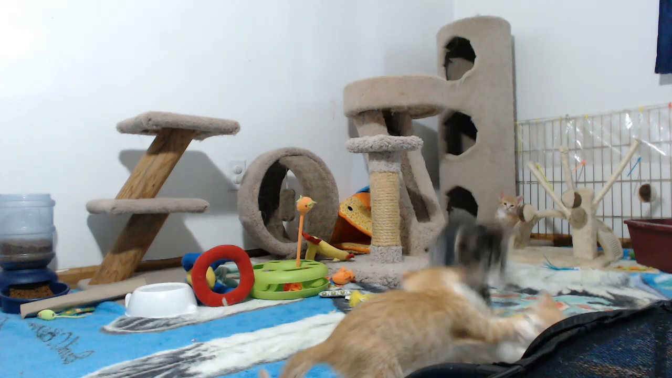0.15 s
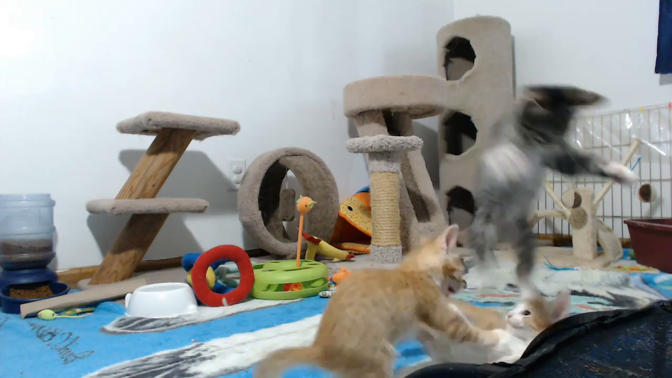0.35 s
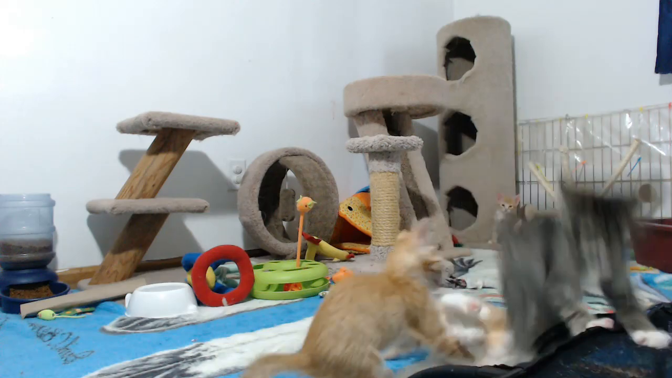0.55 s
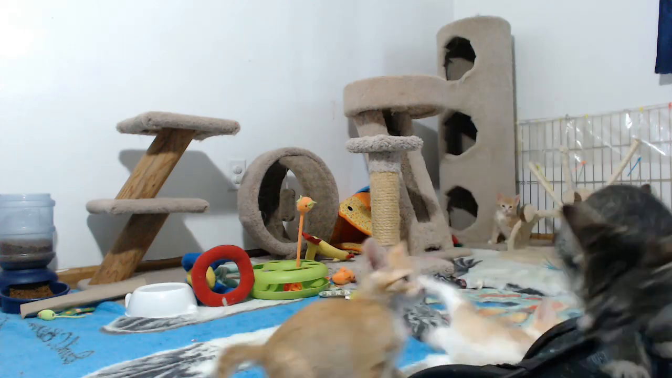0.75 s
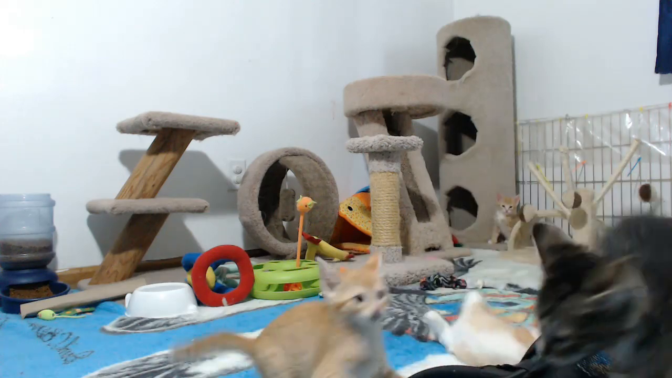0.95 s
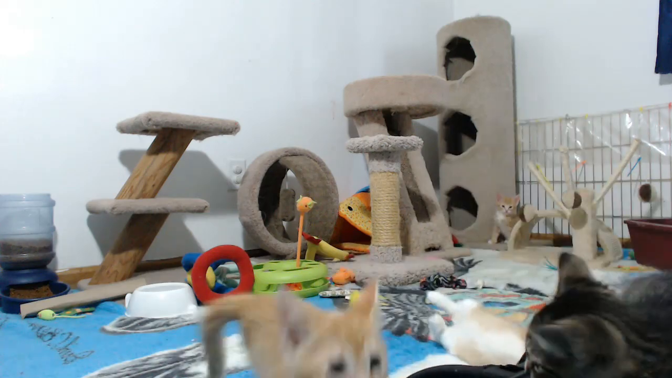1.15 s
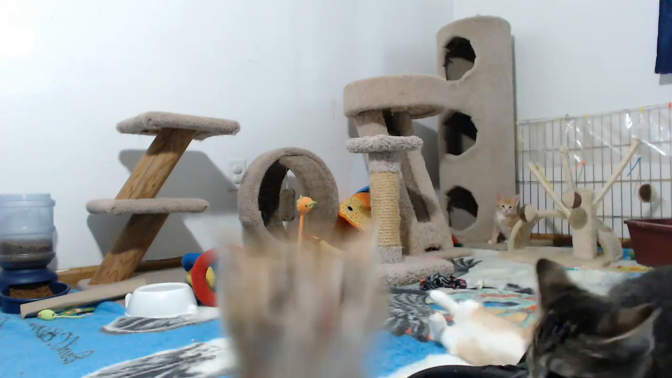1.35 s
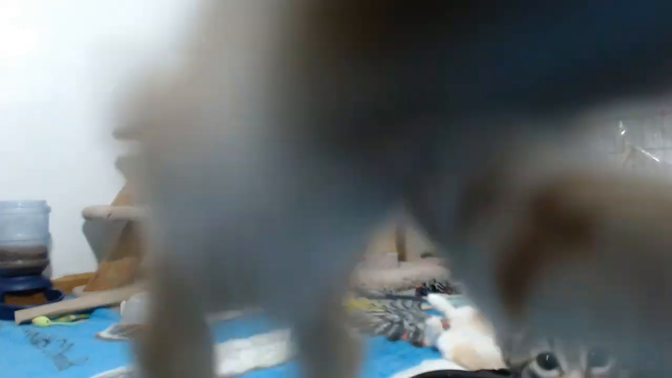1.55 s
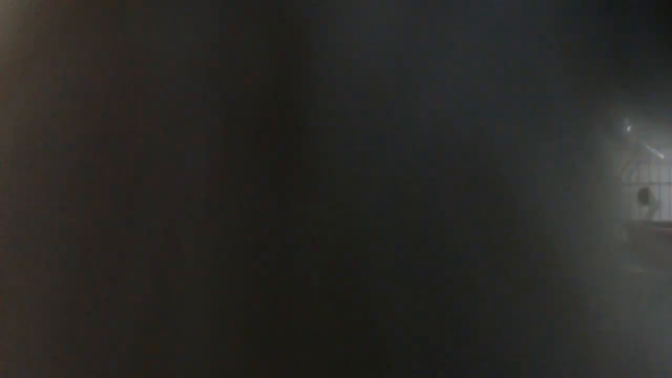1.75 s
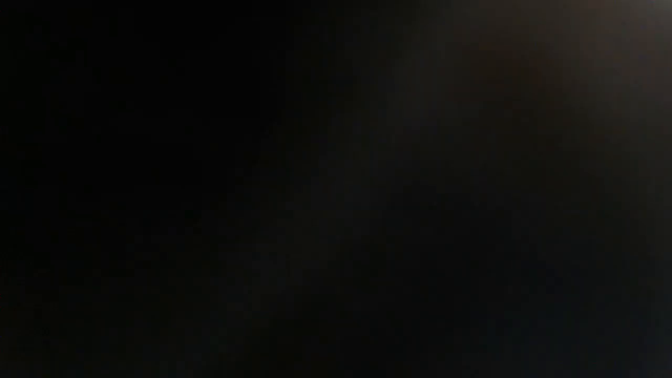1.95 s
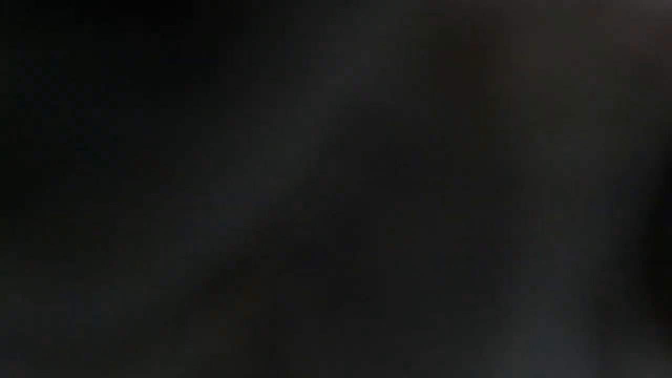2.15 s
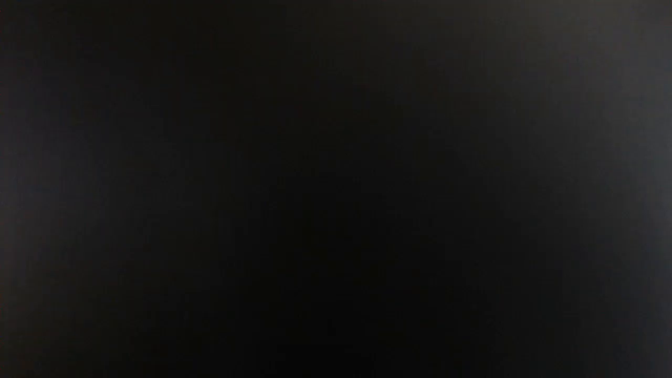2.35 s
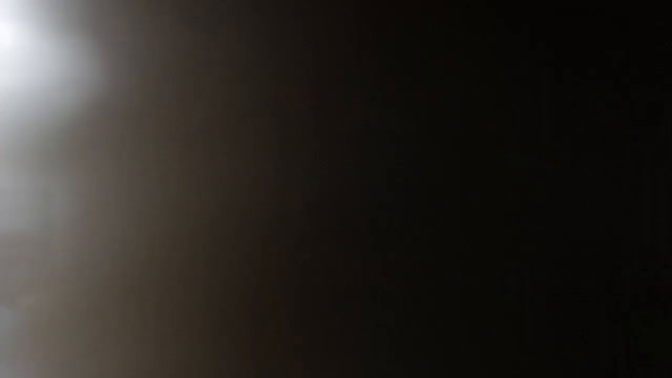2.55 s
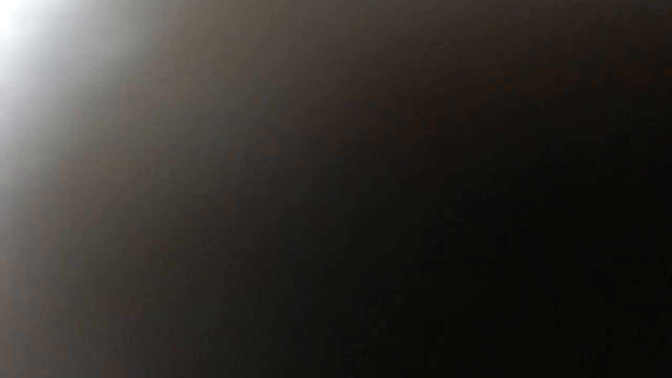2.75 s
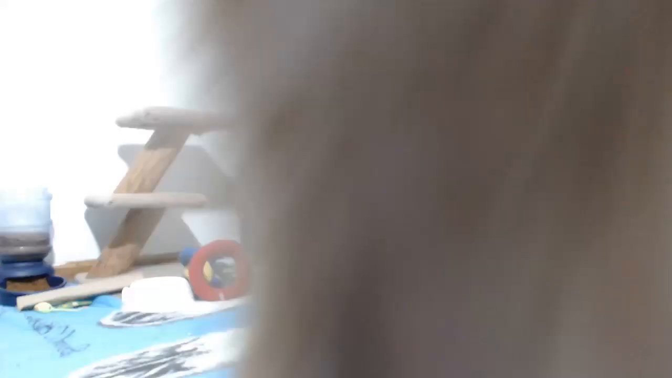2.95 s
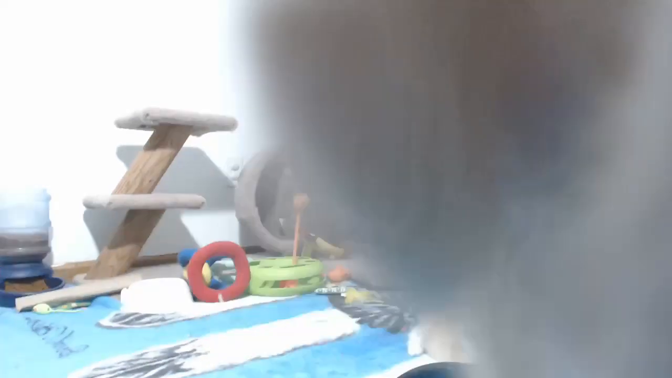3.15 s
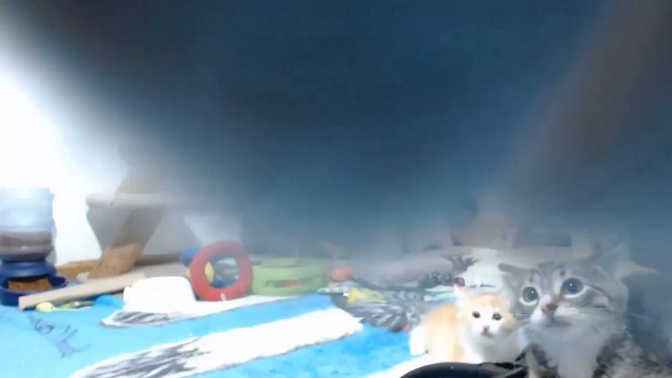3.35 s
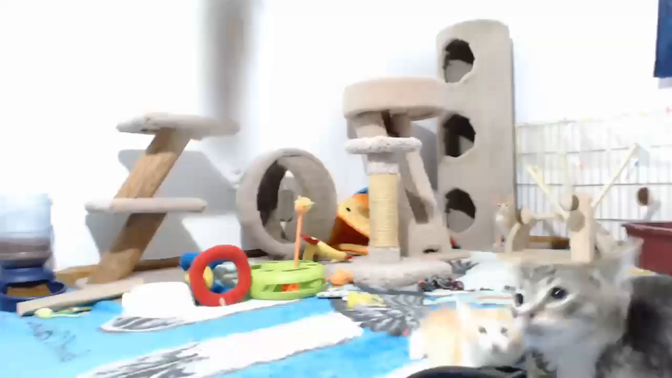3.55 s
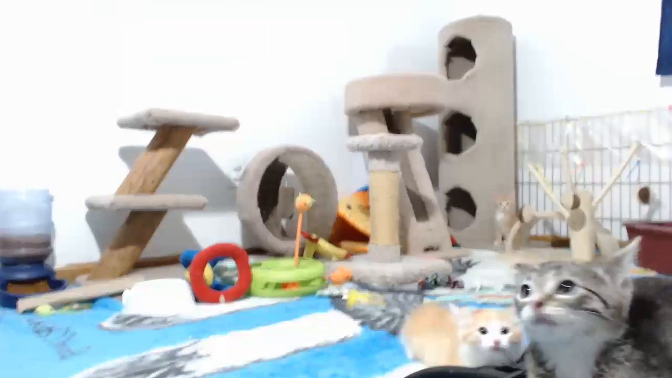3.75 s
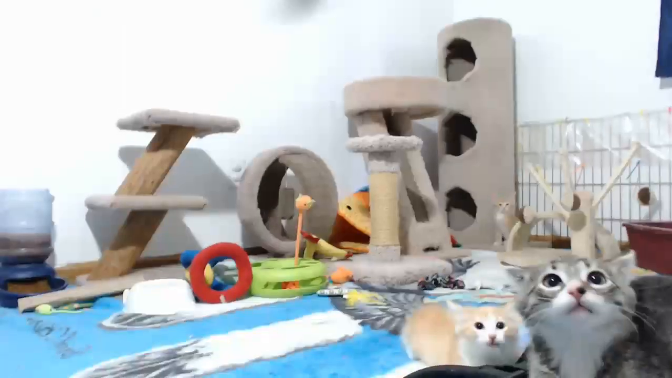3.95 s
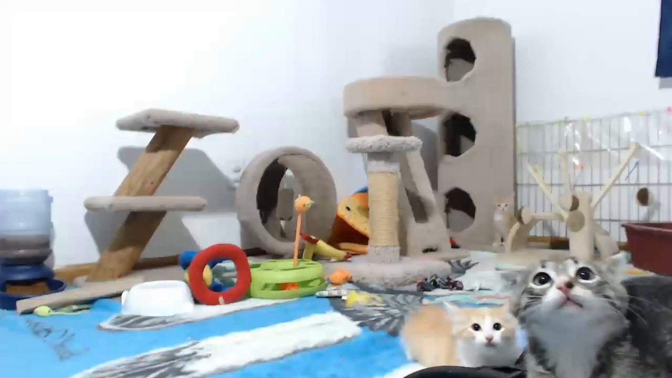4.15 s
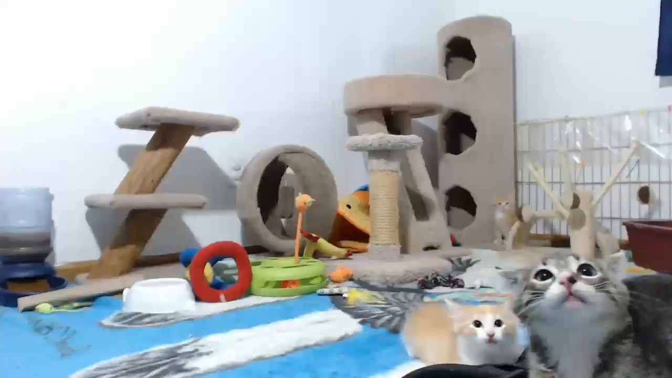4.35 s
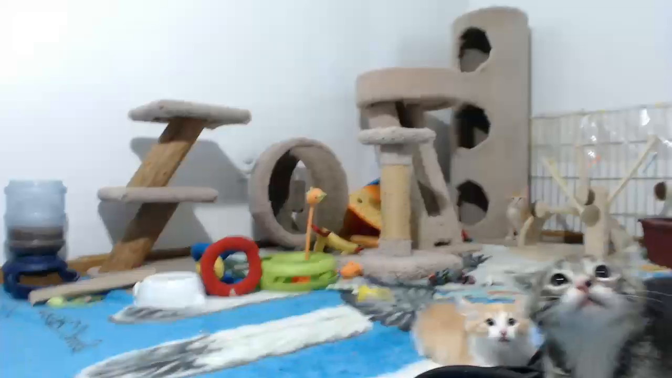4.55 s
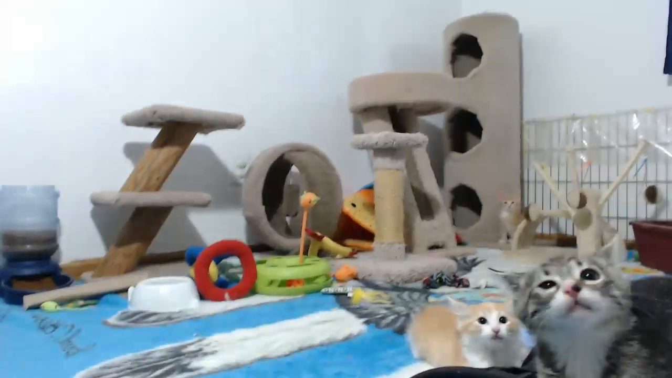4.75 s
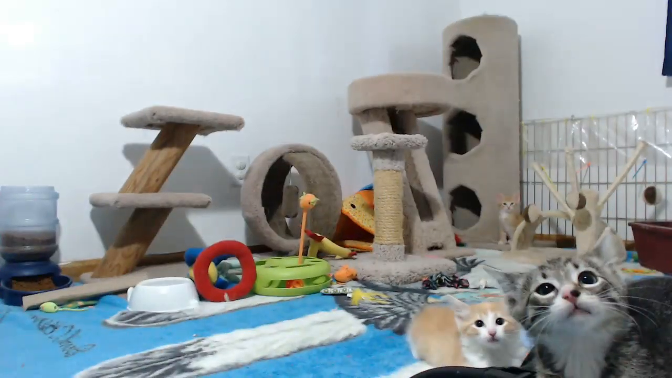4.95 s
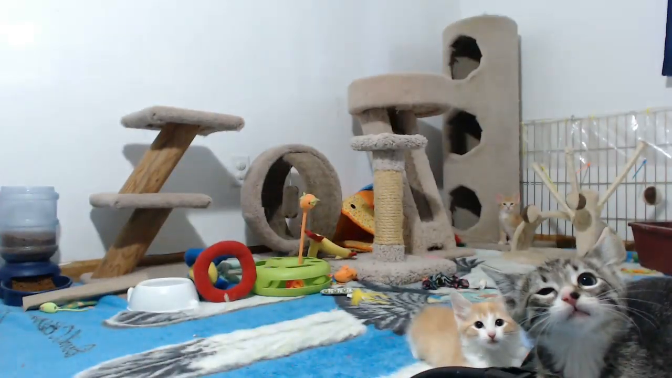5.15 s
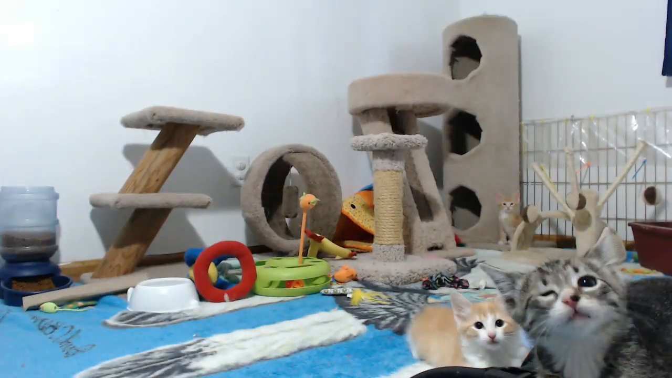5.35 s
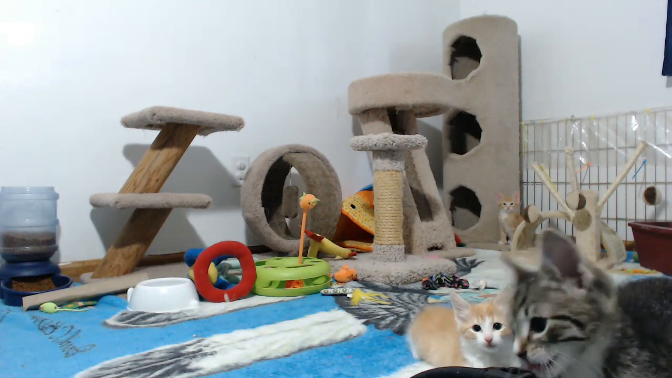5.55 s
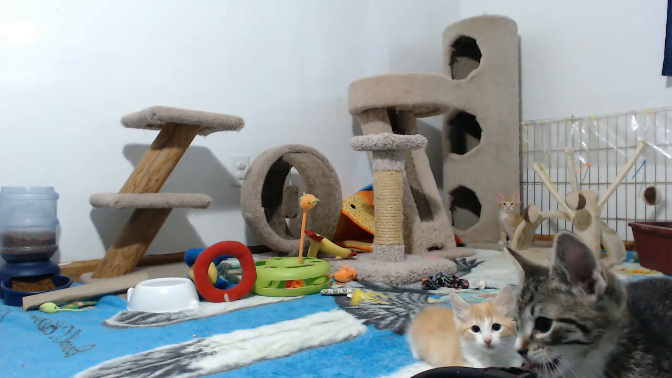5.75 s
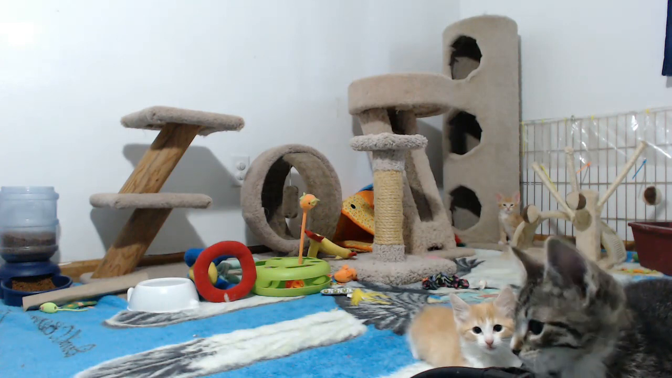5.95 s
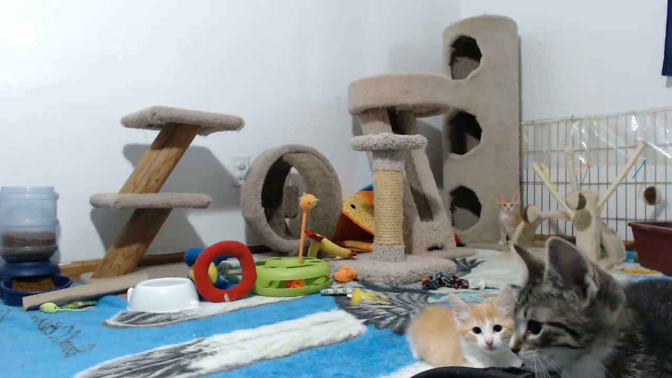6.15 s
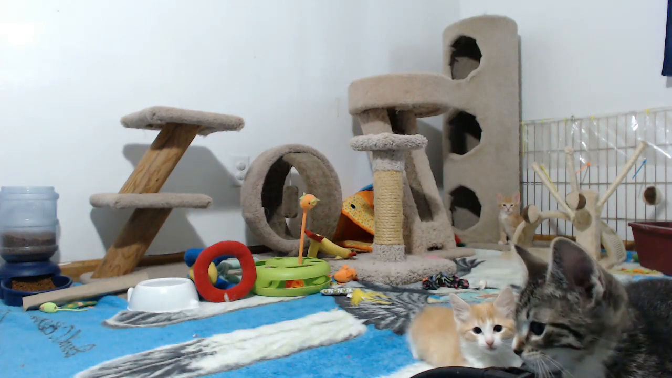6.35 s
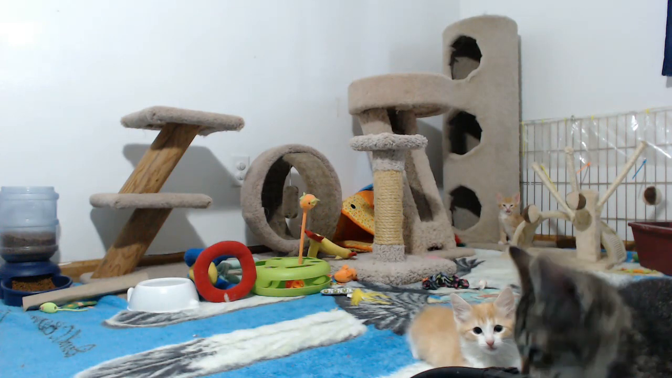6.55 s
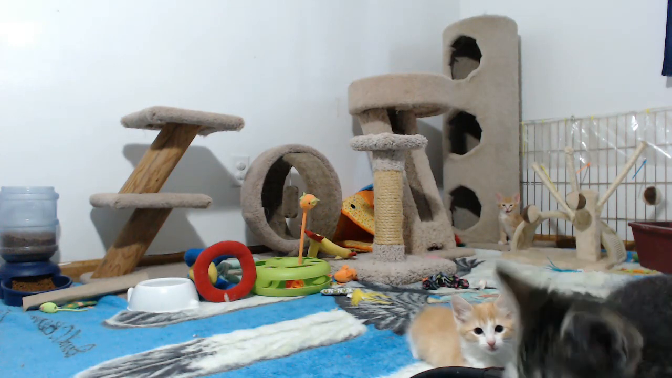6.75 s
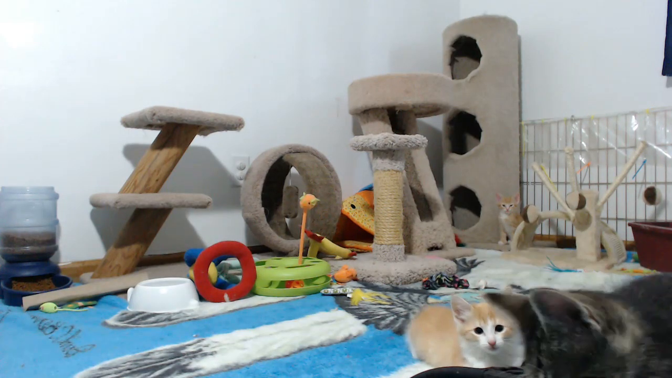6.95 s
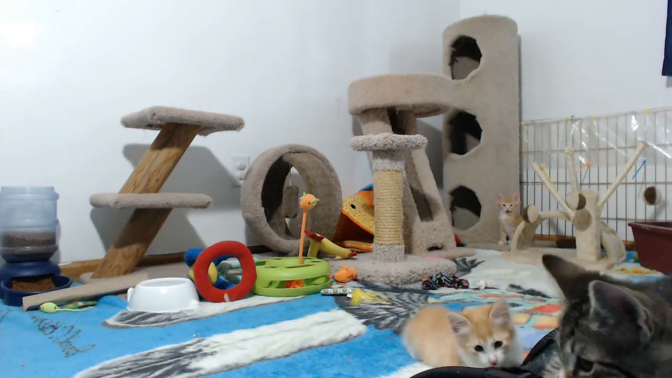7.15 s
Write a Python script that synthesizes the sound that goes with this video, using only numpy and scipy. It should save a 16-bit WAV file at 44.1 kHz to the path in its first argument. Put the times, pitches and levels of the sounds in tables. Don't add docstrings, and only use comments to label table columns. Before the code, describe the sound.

In a quiet room, kittens' paws thud softly and claws tick on the floor. A kitten then climbs on the webcam: very close thumps, dry fur rubbing, claw scrapes and hollow plastic knocks, the hardest ones clipping. After about five seconds contact stops, leaving faint room hiss, a far truck's low throbbing drone and a few tiny paw taps.

```python
import sys
import numpy as np
from scipy import signal
from scipy.fft import rfft, irfft, next_fast_len
from scipy.io import wavfile
from scipy.ndimage import uniform_filter1d

SR = 44100
rng = np.random.default_rng(int(sys.argv[2]) if len(sys.argv) > 2 else 0)


def ratio(d):
    e = np.asarray(d, float) / 20
    return 10 ** e


def put_to_file(sound):
    columns = np.atleast_2d(sound).T
    safe = np.clip(columns, -1, 1)
    whole_steps = np.round(safe * 32767)
    wavfile.write(sys.argv[1], SR, whole_steps.astype(np.int16))


N = 317869
T = np.arange(N) / SR


def level(x, db):
    return x * ratio(db) / np.sqrt(np.mean(x ** 2))


def band(x, lo_hz, hi_hz, order=3):
    sos = signal.butter(order, [lo_hz, min(hi_hz, .45 * SR)], "bandpass", fs=SR, output="sos")
    return signal.sosfilt(sos, x)


def colour(x, points, size=2048):
    hz, db = np.transpose(points)
    bin_hz = np.arange(size // 2 + 1) * SR / size
    log_gain = np.interp(np.log(bin_hz + 1), np.log(hz), db) * np.log(10) / 20
    cepstrum = irfft(log_gain)
    cepstrum[1:size // 2] *= 2
    cepstrum[size // 2 + 1:] = 0
    impulse = irfft(np.exp(rfft(cepstrum)))
    return signal.fftconvolve(x, impulse[None], axes=1)[:, :N]


def ring(x, hz, t60):
    pole = np.exp(2j * np.pi * hz / SR - np.log(1000) / (t60 * SR))
    return 2 * (1 - abs(pole)) * signal.lfilter([1], [1, -pole], x).real


def width_t60(width_hz):
    return np.log(1000) / (np.pi * width_hz)


def walk(rate, channels=1):
    hold = int(SR / rate)
    held = np.repeat(rng.standard_normal((channels, N // hold + 1)), hold, axis=1)
    return 1.2 * uniform_filter1d(uniform_filter1d(held, hold), hold)[:, :N]


def pair(like):
    like = np.clip(like, -1, 1)
    mid, side = rng.standard_normal((2, N))
    opposed = side * np.array([[1], [-1]])
    return (np.sqrt(1 + like) * mid + np.sqrt(1 - like) * opposed) / np.sqrt(2)


def pan(db):
    return ratio(np.array([db, -db]) / 2)


def decays(times, db, t60, pan_db, rise_s=0.00087):
    out = np.zeros((2, N))
    for s, d, long, p in zip(times, db, np.clip(t60, .01, .5), pan_db):
        on = slice(int(s * SR), int((s + long) * SR))
        t = T[on] - T[on][0]
        out[:, on] += pan(p)[:, None] * ratio(d - 60 * t / long) * (1 - np.exp(-t / rise_s))
    return out


def patchy(x, lo_hz, hi_hz, patchy_db, rate, count):
    size = next_fast_len(N)
    bin_hz = np.arange(size // 2 + 1) * SR / size
    place = count * np.log((bin_hz + 1) / lo_hz) / np.log(hi_hz / lo_hz) - .5
    spectrum = rfft(x, size)
    out = 0
    for k in range(count):
        weight = np.cos(np.pi / 2 * np.clip(place - k, -1, 1)) ** 2
        out = out + irfft(spectrum * weight, size)[:, :N] * ratio(patchy_db * walk(rate, channels=2))
    return out


# f/Hz, level/dB per Hz
ROOM = [(88, -46), (150, -10), (205, -11.5), (239, -30.5), (353, -8), (473, -10), (755, -10.5),
        (1850, -24.5), (2340, -25.5), (3590, -33), (15800, -47.5)]
ROOM_DB, RUMBLE_DB, FRAME_HZ = -67, -68, 15.
# f/Hz, level/dB, place in the frame (0-1), start t/s
WHINES = [
    (5475, -99, .5, -1),
    (8000, -101, 0, 3),
]


def room():
    bass = band(pair(.85), 130, 900) * ratio(1.2 * walk(5))
    top = band(pair(-0.14), 640, 16000, order=2)
    air = level(colour(bass + top, ROOM), ROOM_DB - 3.5)
    rumble = level(band(pair(.97), 28, 200, order=2) * ratio(2 * walk(3)), RUMBLE_DB)
    whine = 0
    for hz, db, place, on in WHINES:
        draw = 1 + np.sin(2 * np.pi * (FRAME_HZ * T + place))
        whine = whine + ratio(db) * np.sin(2 * np.pi * hz * T) * draw * (T > on)
    return (air + rumble + whine) * pan(2.)[:, None]


# t/s, engine cycle f/Hz, level/dB
TRUCK = [(0, 14.3, -62), (.7, 14.65, -58), (1.45, 15.1, -58), (2.5, 15.6, -58), (3.2, 13.6, -65),
         (3.9, 12.95, -55), (4.4, 12.7, -50), (4.8, 12.25, -54), (5.2, 12.05, -52), (5.85, 12.05, -48),
         (6.1, 12.05, -50.5), (6.5, 11.75, -53.5), (7.21, 11.2, -57)]
# order, level/dB re order 8
SIDE_ORDERS = [(4, -24), (7, -18), (10, -14), (11, -24), (16, -28), (17, -28)]
SLOW_HZ, SLOW_WIDTH_HZ, FAST_9_DB, SLOW_9_DB = 12.3, 0.057, -20, -3
ORDER_5_DB, ORDER_5_GROWTH, ORDER_5_LATE_S = -65.5, 0.37, 0.6


def truck():
    s, cycle, level_db = np.transpose(TRUCK)
    hz, db8 = np.interp(T, s, cycle), np.interp(T, s, level_db)
    turn = 2 * np.pi * np.cumsum(hz) / SR
    slow = 1 / (1 + np.exp((hz - SLOW_HZ) / SLOW_WIDTH_HZ))
    db9 = db8 + FAST_9_DB + (SLOW_9_DB - FAST_9_DB) * slow
    late_db = np.interp(T - ORDER_5_LATE_S, s, level_db)
    db5 = ORDER_5_DB + ORDER_5_GROWTH * (late_db - level_db.mean())
    orders = [(8, db8), (9, db9), (5, db5)]
    orders += [(k, db8 + db + 3 * walk(3)[0]) for k, db in SIDE_ORDERS]
    drone = 0
    for k, db in orders:
        drone = drone + np.sqrt(2) * ratio(db) * np.sin(k * turn + 2 * np.pi * rng.random())
    return drone * pan(2.2)[:, None]


ROAR_DB, ROAR_GAIN_DB, ROAR_FROM_S, ROAR_SWELL_S = -70.5, 12.5, 5.3, 0.28


def roar():
    swell = 1 / (1 + np.exp((ROAR_FROM_S - T) / ROAR_SWELL_S))
    rough = level(band(pair(1.0), 95, 120, order=2), 0)
    return rough * ratio(ROAR_DB + ROAR_GAIN_DB * swell + 2 * walk(1.5))


# f/Hz, width/Hz, level/dB
FAN = [
    (763, 14, -80.5),
    (1400, 60, -93.5),
]


def fan():
    air = pair(0.31)
    return sum(level(ring(air, hz, width_t60(width)), db) for hz, width, db in FAN)


# t/s, peak level/dB, treble level/dB re peak
FLOOR_TICKS = [(0.475, -54, -9), (0.497, -45.5, 7.5), (0.5277, -49, -24), (.5827, -54, -20),
               (.6639, -55.5, 7), (.785, -65, -30), (.7935, -69, -28), (1.185, -46.5, -19),
               (5.477, -58, -21), (5.6916, -60.5, -19.5), (6.529, -60.5, -14), (6.707, -61, -10),
               (6.75, -64, -4), (6.795, -62, -5.5), (6.857, -66, 0), (7.037, -64, -1.5), (.295, -61, 3),
               (5.155, -66, -6)]
# t/s, peak level/dB, treble level/dB re peak
CLAW_TICKS = [(1.5842, -8, -8), (1.6625, -21.5, -2), (1.706, -18, 8.5), (1.7138, -15.5, 5),
              (1.806, -13.5, -9), (1.8467, -11, -35), (1.8524, -28, -15), (1.865, -15.5, -18),
              (1.5265, -12.5, -16), (1.601, -19.5, -8), (1.9202, -36, -13), (2.0572, -52, -11),
              (2.391, -39, -20), (2.7752, -46, -19), (3.533, -17, -11), (4.5246, -28.5, -11),
              (2.1948, -46, -24), (2.3296, -24.5, 3), (2.4825, -10.5, -36), (2.6404, -48, -16),
              (2.651, -28, -13), (2.667, -33, -18), (2.924, -11, -9), (2.943, -13.5, -10),
              (3.1025, -30, -32), (3.2379, -37, -19), (3.2675, -36, -23), (3.309, -30.5, -22),
              (3.329, -33, -35), (3.4743, -29, -22), (2.91, -48, -10.5), (4.1668, -30, -19),
              (4.3981, -10, -3), (5.0514, -63, -14)]


def ticks():
    out = 0
    near, far = (CLAW_TICKS, 4.5, .014, 2600, 9000), (FLOOR_TICKS, 2.2, .02, 2000, 6500)
    for rows, pan_db, t60, edge_hz, top_hz in (near, far):
        at, db, bright_db = np.transpose(rows)
        long, side_db = np.full(len(at), t60), np.full(len(at), pan_db)
        dull = level(band(pair(0.21), 330, edge_hz, order=1), 0)
        dull *= decays(at, db - 12.0, long, side_db, rise_s=0.00016)
        bright = level(band(pair(.3), edge_hz, top_hz, order=2), 0)
        bright *= decays(at, db + bright_db - 15.0, long, side_db, rise_s=0.00024)
        snap = np.zeros(N)
        snap[(at * SR).astype(int) + SR // 2000] = -ratio(db + 4.0)
        out = out + dull + bright + band(snap, 300, edge_hz + 1500, order=1) * pan(pan_db)[:, None]
    return out


# t/s, thud level/dB, rustle level/dB, t60/s
PAWS = [(0.477, -37, -62, 0.11), (0.492, -32, -69, 1), (0.527, -25.5, -81, 0.097), (0.663, -51, -73, 0.22),
        (0.786, -30, -84, 0.16), (0.947, -70, -64.5, 0.21), (1.182, -69, -67.5, 0.4),
        (1.31, -49.5, -70.5, 0.27), (1.419, -71, -74.5, 0.65), (5.151, -41, -73, 0.22),
        (5.479, -48, -79, 0.13), (5.687, -49.5, -83.5, 0.13), (6.529, -49.5, -88, 0.16),
        (6.72, -55.5, -75.5, 0.38), (6.885, -62, -80, 0.48), (6.935, -47, -71, 0.22),
        (7.049, -61, -70, 0.15)]


def paws():
    at, thud_db, rustle_db, t60 = np.transpose(PAWS)
    left_db = np.full(len(at), 2.2)
    thud = level(band(pair(.95), 40, 330, order=3), 0)
    body = level(band(pair(.7), 450, 1700, order=2), 0)
    rustle = level(band(pair(.3), 900, 5000, order=2) * ratio(3 * walk(300)), 0)
    thud *= decays(at, thud_db - 17.5, 0.27 * t60, left_db, rise_s=0.0027)
    body *= decays(at, thud_db - 30.0, 1.2 * t60, left_db, rise_s=0.0059)
    rustle *= decays(at, rustle_db, 0.45 * t60, left_db, rise_s=0.0094)
    return thud + body + rustle


# t/s, peak level/dB, f/Hz, t60/s
KNOCKS = [(0.49, -42.5, 130.2, 0.41), (0.786, -48, 160, 0.17), (1.308, -39, 135, 0.13),
          (1.311, -42.5, 63.4, 0.33), (0.499, -41, 60, 0.27), (1.517, -28, 445, 0.024),
          (2.924, -3, 735, 0.0037), (2.939, -28.5, 545, 0.074), (4.399, -14.5, 501, 0.055),
          (4.744, -34.5, 318, 0.076), (4.857, -31.5, 233, 0.107)]
# t/s, peak level/dB, f/Hz, t60/s
PINGS = [(1.5056, -49, 4760, 0.026), (1.671, -32, 3640, .03), (1.728, -29, 3840, 0.026),
         (1.9202, -32.5, 4700, 0.032), (1.9456, -37.5, 4860, 0.044), (1.9935, -41.5, 2360, 0.046),
         (2.0574, -50, 4300, 0.034), (2.0753, -55, 2580, 0.026), (2.1162, -37, 1740, 0.028),
         (2.194, -46, 2170, 0.081), (2.2858, -47, 1770, .03), (2.3317, -35, 4870, 0.02),
         (2.5971, -33, 1844, 0.066), (2.668, -31, 1050, 0.036), (2.7752, -37.5, 1550, 0.05),
         (2.825, -51, 2300, .02), (3.1025, -39.5, 2870, .04), (3.172, -51, 2400, 0.027),
         (3.24, -39.5, 2850, 0.025), (3.309, -39, 1290, 0.024), (3.33, -35, 1400, 0.053),
         (3.37, -49, 2420, .03), (4.076, -53, 1460, 0.018), (4.139, -42.5, 1520, 0.01),
         (4.808, -53, 3500, .03), (5.0517, -65, 3060, 0.027), (5.0517, -61.5, 1900, .03),
         (5.105, -68, 1930, 0.041), (5.155, -64.5, 1680, 0.048), (5.155, -73, 3700, 0.033),
         (5.4767, -74, 3000, .02), (5.6928, -69, 1630, 0.055), (6.5284, -68.5, 2200, 0.038),
         (6.7065, -66, 1084, 0.038), (.7935, -65, 1860, 0.037), (1.185, -66, 2300, 0.03)]
PING_DAMPING = .4


def knocks():
    out = np.zeros((2, N))
    pings = [(s, db + 5, hz, PING_DAMPING * t60) for s, db, hz, t60 in PINGS]
    for s, db, hz, t60 in list(KNOCKS) + pings:
        on = slice(int(s * SR), int((s + t60) * SR))
        swing = np.sin(2 * np.pi * hz * (T[on] - s) - np.array([[0], [.6]]))
        out[:, on] += swing * decays([s], [db], [t60], [2.5], rise_s=0.23 / hz)[:, on]
    return out


# t/s, slip level/dB, weight on the housing level/dB
STROKE = [(1.492, -74.5, -40.5), (1.6, -69, -45.5), (1.682, -44, -34.5), (1.77, -37, -33.5),
          (1.96, -48.5, -52), (2.25, -63.5, -58.5), (2.36, -49, -40.5), (2.51, -58, -47.5),
          (2.88, -68, -54), (2.93, -57.5, -38.5), (3.32, -64, -57), (3.59, -50, -36), (3.84, -69, -55),
          (4.07, -70, -52.5), (4.26, -61, -56), (4.5, -53, -48.5), (4.8, -68.5, -45.5), (5.17, -85, -74)]
# t/s, extra treble level/dB
FINENESS = [(1.5, 0.), (1.87, -1), (2.05, 1), (2.25, 2.5), (2.45, -1), (2.7, 3.5), (2.87, 2.5), (3.15, 0.5),
            (3.8, 1), (4.0, 3), (4.35, 0.5), (4.75, -1.5), (5.0, -3)]
# t/s, left minus right level/dB
SIDE_OF_TOUCH = [(1.5, 3.5), (2.0, 7), (2.5, 5), (3.2, 2.5), (3.6, 4.5), (4.4, 3), (4.55, 4), (4.9, 6.5)]
# t/s, peak level/dB, treble level/dB re peak, low-mid level/dB re peak, t60/s
THUMPS = [(1.5061, -26.5, -3.5, 13, 0.19), (1.514, -9.5, -11, -7, 0.41), (1.5615, -13, -4, -1.5, 0.17),
          (1.5825, -10.5, -18.5, -10.5, 0.22), (1.67, -27, 1, 8.5, 0.21), (1.694, -19, -5, 9, 0.066),
          (1.701, -22.5, 1.5, 12.5, .21), (1.747, -9, -12.5, -2, 0.38), (1.7763, -33, 14.5, 22, 0.15),
          (1.8238, -35.5, 11, 13, 0.06), (1.845, -20, -4.5, 8, 0.12), (2.3484, -12, -9, -8, 0.24),
          (2.434, -17.5, -7, -7, 0.25), (2.549, -38.5, -8.5, 1, 0.17), (2.6646, -28.5, -8, -1.5, .2),
          (2.924, -14, -6, -5.5, 0.36), (3.231, -29.5, -13.5, -7, 0.14), (3.329, -30, -14, -1, 0.2),
          (3.5565, -9, -10, -4, 0.47), (3.683, -25.5, -11.5, 0, 0.43), (4.136, -46.5, -11.5, 15, 0.12),
          (4.4, -3, -12, -9.5, 0.28), (4.4709, -25, -47, 3.5, 0.13), (4.6385, -28, -18.5, -9.5, 0.74)]
# t/s, peak level/dB, treble level/dB re peak, t60/s
RAKES = [(1.597, -20, -9.5, 0.26), (1.9196, -24, -2.5, 0.15), (1.949, -54, 3, 0.84),
         (2.057, -37, -4.5, 0.1), (2.116, -38, -3, 0.2), (2.193, -40, -6, .1), (2.285, -47, -4.5, .1),
         (4.0, -50.5, -7, .3), (2.389, -27.5, -16.5, 0.51), (2.594, -18.5, -11, 0.21),
         (2.684, -26, -16, 0.11), (2.739, -24, -15, 0.11), (2.774, -23.5, -17, 0.15),
         (2.937, -11.5, -13.5, 0.1), (3.1015, -28, -18, 0.18), (3.211, -43.5, -6, 0.93),
         (3.4181, -7, -12, .14), (3.533, -13.5, -12, 0.28), (3.5794, -32, -5.5, .13),
         (4.1873, -20.5, -9.5, 0.29), (4.297, -24.5, -9.5, 0.1), (4.414, 6.5, -34.5, 0.031),
         (4.5246, -28, -7, 0.44), (4.593, -38.5, 4, 0.17), (4.6184, -28, -15, 0.44),
         (4.804, -32.5, -14, 0.12), (4.8454, -32, -13, 0.38), (4.9277, -34.5, -11, 0.3)]
RAKE_LOW_DB = -12
# f/Hz, level/dB per Hz
HOUSING = [(88, -37.5), (150, 0.5), (259, -6), (512, -5.5), (935, -5), (1780, 2.5), (1960, -0.5),
           (2730, -11.5), (3800, -9), (4900, -12.5), (5830, -22), (10100, -32.5), (11500, -23),
           (14600, -42), (15800, -54.5)]
# f/Hz, width/Hz, level/dB
SHELL = [(1134, 97, 5), (1350.5, 30, -2), (1652, 270, -9.5), (1590, 22, -12.5), (3810, 380, -10),
         (4910, 320, -15.5), (4665, 110, -8), (11100, 220, -17.5)]
# f/Hz, level/dB, t60/s
STAND = [(1330, -6, .5), (1357, -6, .8), (1410, -5, .8), (1448, 0, 1.5), (1486, -4, 1.4), (1525, -9, 1.8),
         (2805, -8, .7)]
SLIP_REF_DB = -50
TREBLE_DB, TREBLE_GROWTH, LOW_DB, LOW_GROWTH = -53.5, 0.97, -45.5, 0.64


def rubbing():
    s, slip_db, weight_db = np.transpose(STROKE)
    fade = np.clip((T - s[0]) / 0.024, 0, 1) * np.clip((s[-1] - T) / 0.12, 0, 1)
    body_db, rumble_db = np.interp(T, s, slip_db), np.interp(T, s, weight_db)
    over_db = body_db - SLIP_REF_DB
    treble_db = TREBLE_DB + TREBLE_GROWTH * over_db + np.interp(T, *np.transpose(FINENESS))
    low_db = LOW_DB + LOW_GROWTH * over_db
    rakes = [(when, db, sharp, RAKE_LOW_DB, long) for when, db, sharp, long in RAKES]
    at, peak_db, sharp_db, dull_db, t60 = np.transpose(list(THUMPS) + rakes)
    side_db = np.interp(at, *np.transpose(SIDE_OF_TOUCH))
    pan_db = 0.66 + np.interp(T, *np.transpose(SIDE_OF_TOUCH))

    snaps = (rng.random(N) < 350 / SR) * ratio(4 * rng.exponential(size=N))
    snaps = signal.lfilter([1], [1, -np.exp(-1 / (.0012 * SR))], np.minimum(snaps, 3))
    slips = (1 + .3 * snaps) * ratio(2.0 * walk(900, channels=2) + 2.2 * walk(130))

    raw = [colour(slips * pair(like), HOUSING) for like in (-.3, .6, .05)]
    low = level(band(raw[0], 170, 850), 0)
    body = level(patchy(raw[1], 850, 2300, 2., 30, count=3), 0)
    treble = level(patchy(raw[2], 2300, 16000, 2.5, 22, count=11), 0)

    crack = decays(at, peak_db + sharp_db - 25.5, 0 * at + 0.0077, side_db, rise_s=0.00013)
    low_blows = decays(at, peak_db + dull_db - 8.0, .5 * t60, side_db, rise_s=0.00046)
    body_blows = decays(at, peak_db - 20, 0.86 * t60, side_db, rise_s=0.002)
    treble_blows = decays(at, peak_db + sharp_db - 8.5, 0.57 * t60, 1.3 * side_db, rise_s=0.0009)
    low *= fade * ratio(low_db) * pan(0.79)[:, None] + low_blows
    body *= fade * ratio(body_db) * pan(0.7)[:, None] + body_blows + crack
    treble *= fade * ratio(treble_db) * pan(pan_db) + treble_blows + crack

    shell = 0
    for hz, width, db in SHELL:
        shell = shell + ratio(db + 4 * walk(14)) * ring(body + treble, hz, width_t60(width))
    hard = (body + treble).mean(axis=0) * (ratio(-2) + decays(at, peak_db - 8, t60, 0 * at)[0])
    stand = sum(ratio(db) * ring(hard, hz, long) for hz, db, long in STAND)
    rumble = level(band(pair(0.096), 42, 130, order=2), 0) * fade * ratio(rumble_db + 4.0)
    return low + body + treble + shell + ratio(10.0) * stand + rumble


# t/s, peak level/dB, f/Hz, left minus right level/dB
SHOVES = [(1.505, -24.5, 43.5, -3.5), (2.412, -27, 120, -6), (2.794, -35, 89.5, -6), (1.518, -22, 97, -6.5),
          (1.559, -40.5, 593, -9), (1.679, -26, 71, 11), (1.77, -29.5, 41, 19.5), (1.786, -19, 109, 16),
          (2.081, -35.5, 81.8, -9), (2.337, -20, 86, 0), (2.425, -30, 82, -10), (2.581, -29, 92.5, -4),
          (2.664, -30.5, 81, -2.0), (2.925, -9, 396, 13.5), (2.937, -24.5, 138, 0), (3.025, -29, 70.6, -16),
          (3.402, -33, 101, -10), (4.393, -25.5, 41, -4.5), (4.402, -12, 117.6, 9), (4.748, -28, 272, 1),
          (4.865, -24, 176.3, 4)]


def shoves():
    out = np.zeros((2, N))
    sign = rng.choice([-1, 1], (len(SHOVES), 2))
    for (s, db, hz, pan_db), (flip, lead) in zip(SHOVES, sign):
        t = np.arange(int(1.5 * SR / hz)) / SR
        apart = np.array([[0], [lead * np.pi / 2]])
        swing = np.sin(2 * np.pi * hz * t + apart) * np.sin(np.pi * t / t[-1]) ** 2
        start = int(s * SR)
        out[:, start:start + len(t)] += ratio(db) * flip * pan(pan_db)[:, None] * swing
    return out


# t/s, peak level/dB, f/Hz, t60/s
SQUEAKS = [(1.702, -32, 3800, 0.61), (1.8262, -31, 3900, 0.49), (2.3506, -13.5, 3600, 0.048),
           (2.434, -26.5, 3800, 0.1), (3.5794, -22, 4400, 0.28), (4.2358, -33.5, 3640, 0.18),
           (4.594, -26, 3230, 0.047), (4.621, -26, 4200, 0.21), (4.6444, -38, 2300, 0.1),
           (4.847, -31.5, 4470, 0.048), (4.929, -36.5, 5200, 0.061), (4.617, -39.5, 11600, 0.22),
           (4.846, -47, 14000, 0.12), (4.929, -49.5, 10500, 0.083), (2.057, -48, 11000, 0.073),
           (4.205, -44, 4600, 0.27), (4.2, -42, 1600, 0.067), (4.527, -33.5, 5040, 0.053),
           (4.594, -36.5, 3100, 0.055), (4.846, -41.5, 3900, 0.17), (4.96, -56, 2770, 0.34),
           (4.97, -54, 4140, 0.13), (2.6, -32, 3800, .1), (2.78, -44, 4240, 0.11), (2.15, -46, 5100, .2),
           (4.65, -40, 3700, 0.14), (1.8, -38, 4200, .1), (2.06, -35, 4300, 0.24)]


def squeaks():
    scrape, out = pair(.2), np.zeros((2, N))
    for s, db, hz, t60 in SQUEAKS:
        on = slice(int(s * SR) - SR // 10, int(s * SR) + SR // 2)
        narrow = level(ring(scrape[:, on], hz, 0.014), 0)
        out[:, on] += narrow * decays([s], [db - 8.5], [t60], [8.], rise_s=0.0061)[:, on]
    return out


def scene():
    around = room() + truck() + roar() + fan() + paws()
    contact = ticks() + knocks() + rubbing() + shoves() + squeaks()
    return around + contact


def low_pass(x):
    return signal.sosfilt(signal.butter(12, 15900, fs=SR, output="sos"), x)


CLIP, TOP_HZ = .25, 15050


def record(dry):
    flat = dry / (1 + np.abs(dry / CLIP) ** 4) ** (1 / 4)
    dull = signal.sosfilt(signal.ellip(8, .5, 50, TOP_HZ, fs=SR, output="sos"), flat)
    return low_pass(dull)


dry = scene()
out = record(dry)
put_to_file(out)
```